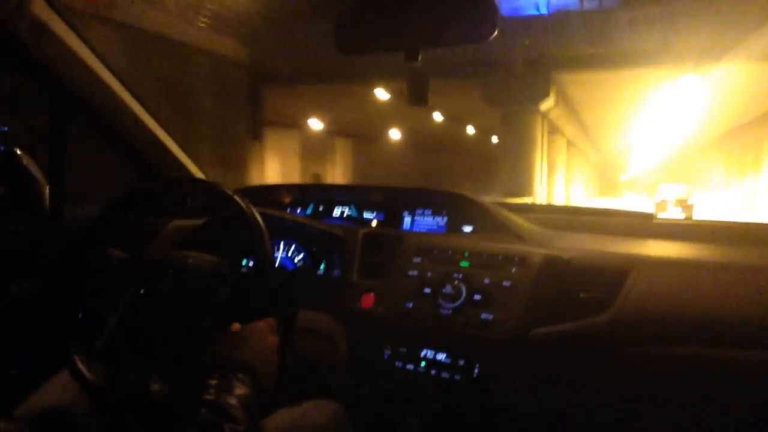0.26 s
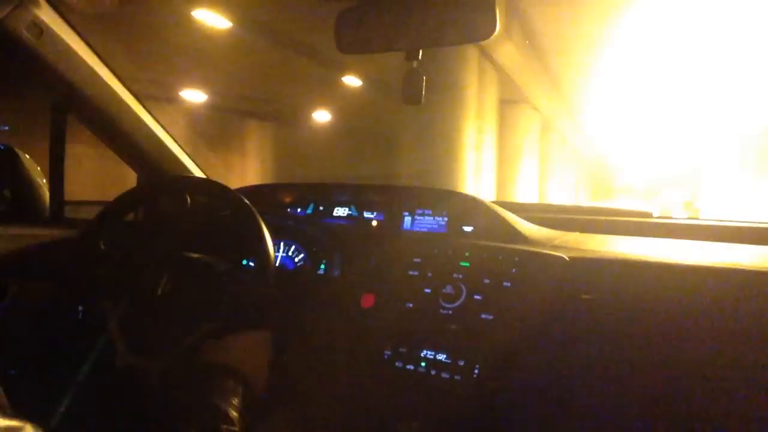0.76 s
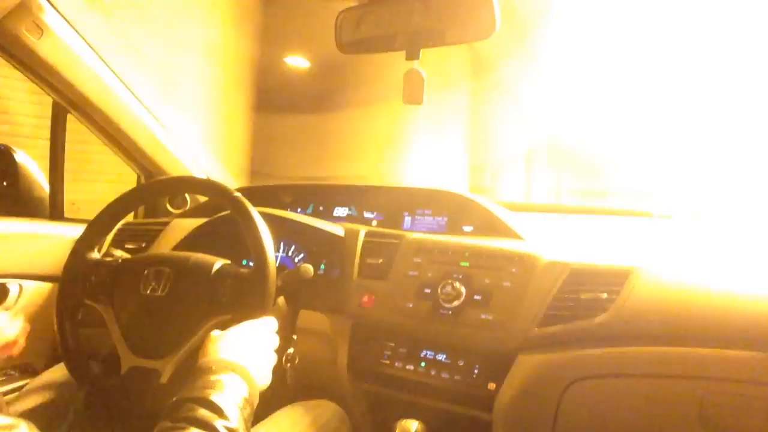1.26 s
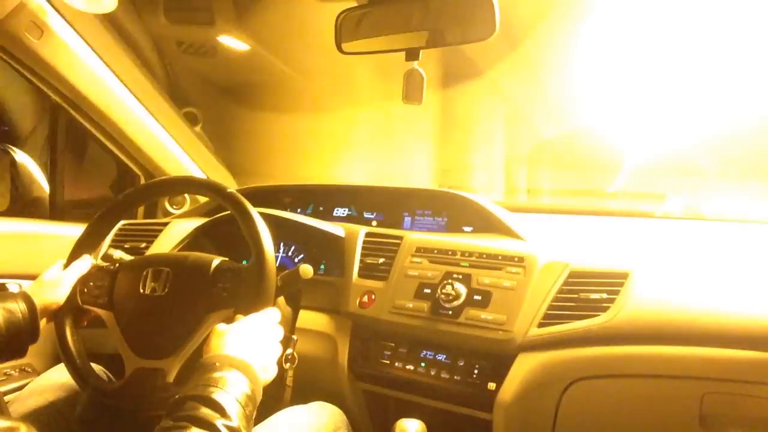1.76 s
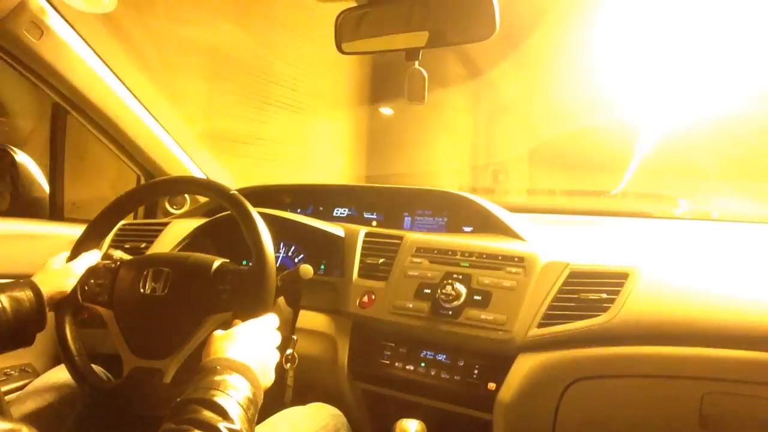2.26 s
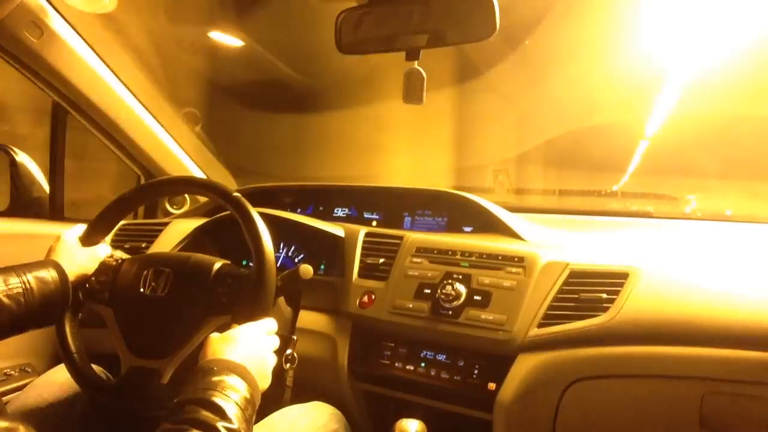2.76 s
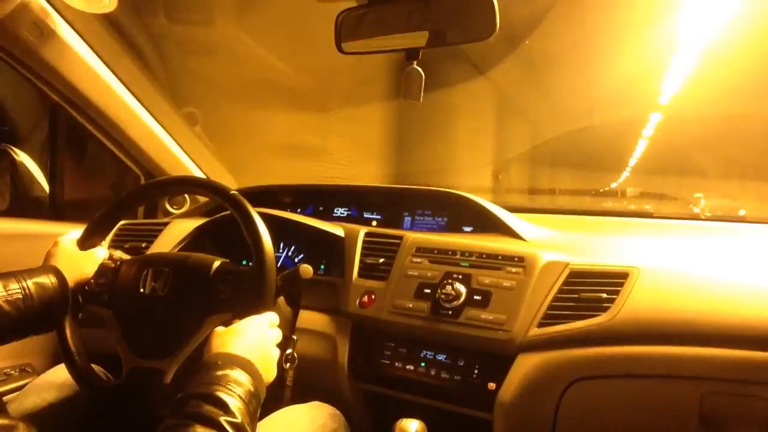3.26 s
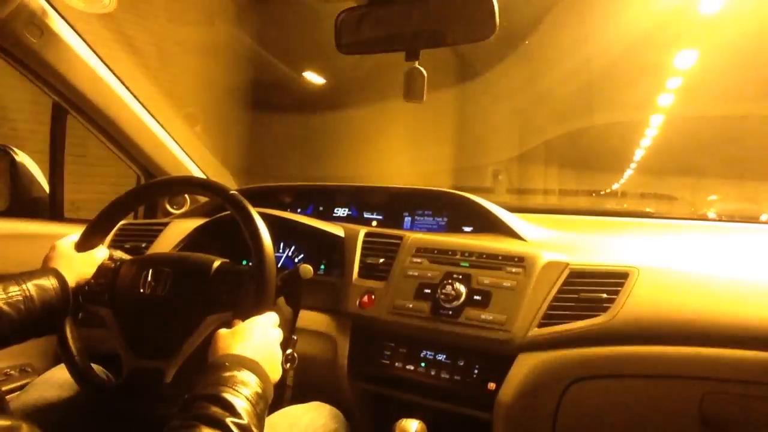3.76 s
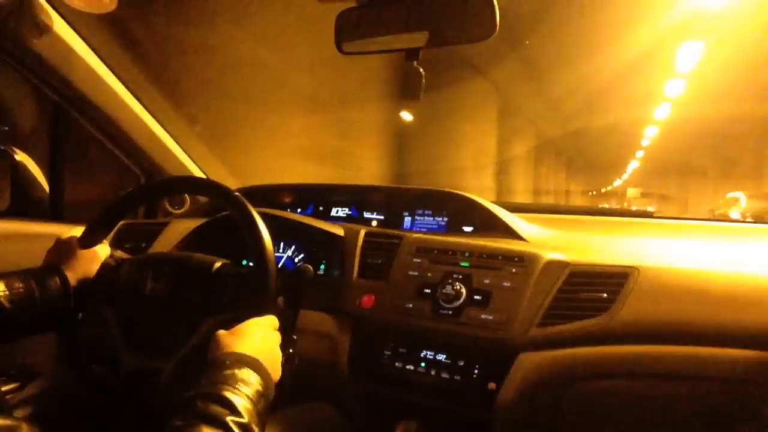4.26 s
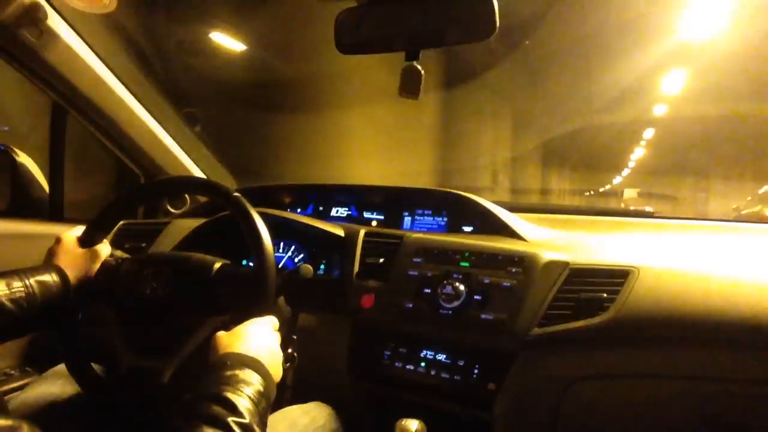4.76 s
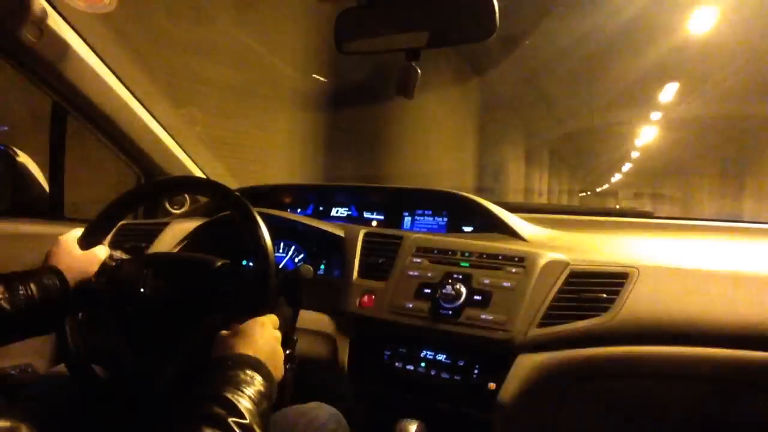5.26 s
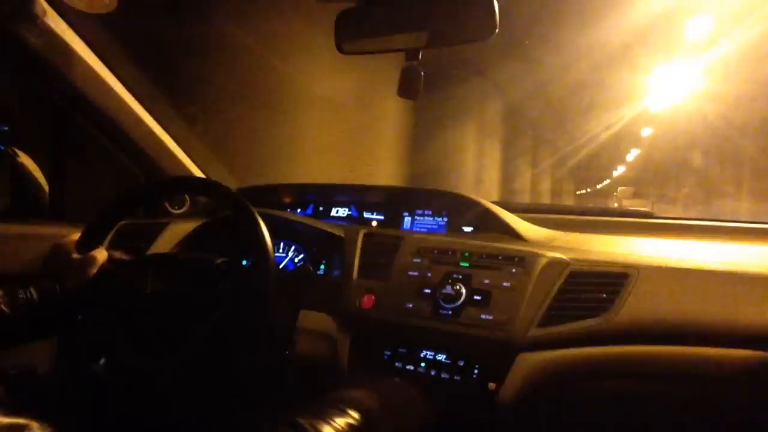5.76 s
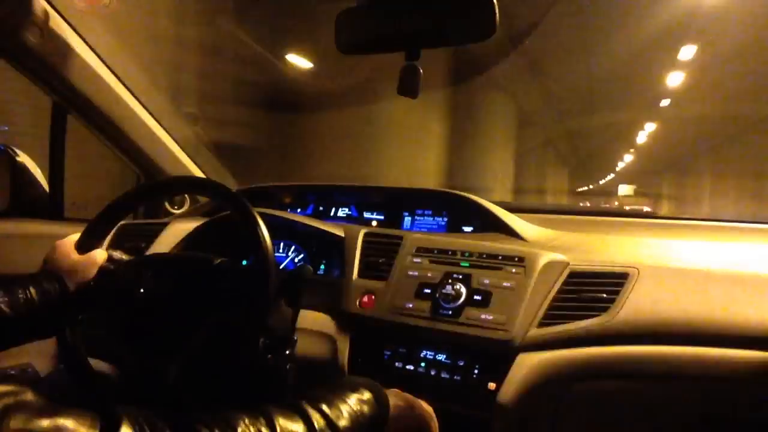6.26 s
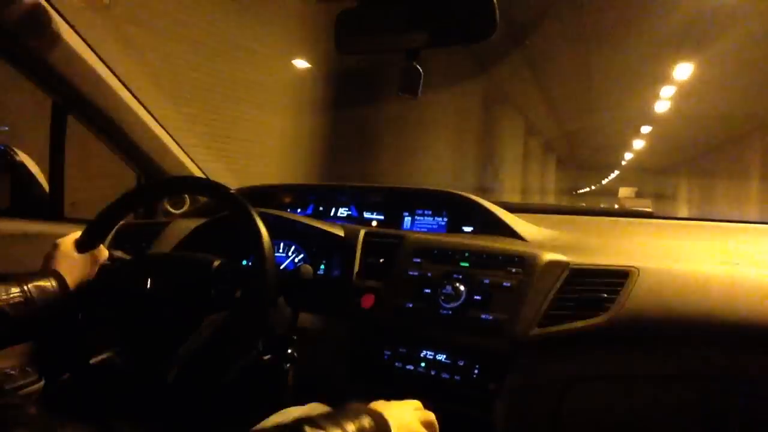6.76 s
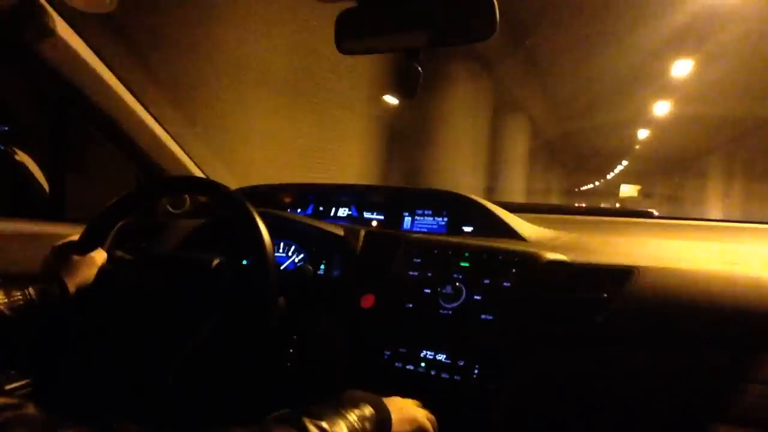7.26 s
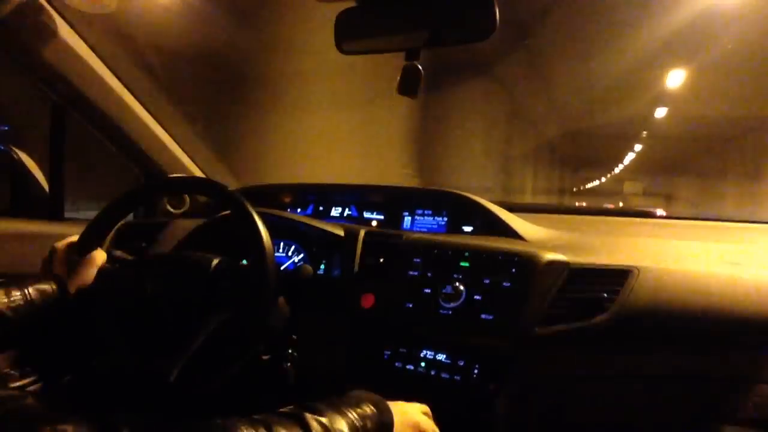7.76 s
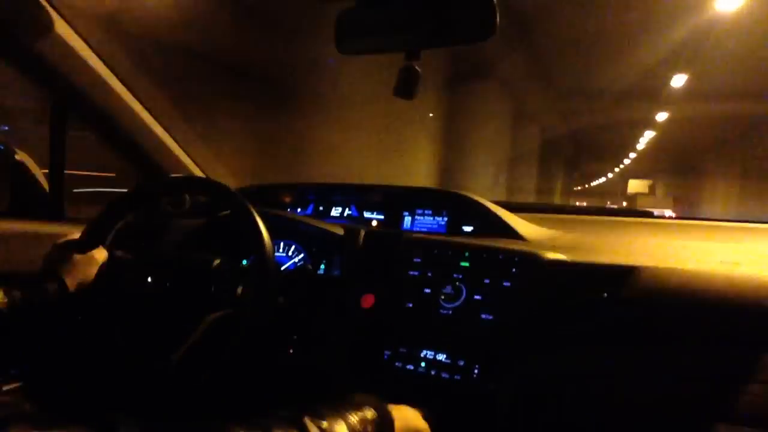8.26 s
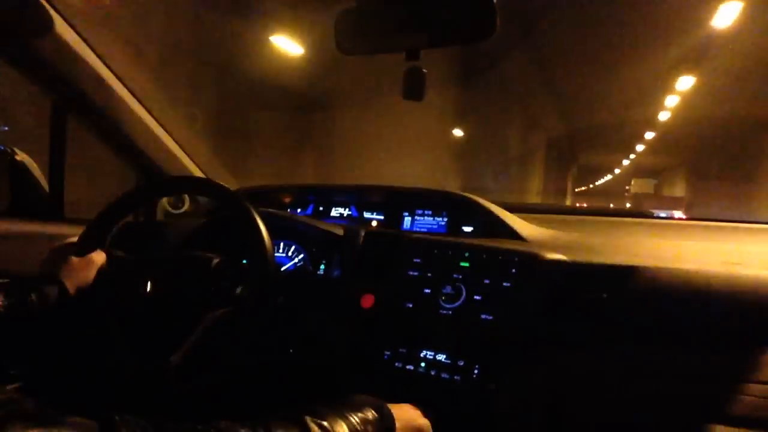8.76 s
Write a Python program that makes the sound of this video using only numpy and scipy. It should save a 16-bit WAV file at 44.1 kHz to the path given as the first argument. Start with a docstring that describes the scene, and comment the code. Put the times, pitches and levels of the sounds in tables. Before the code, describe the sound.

Inside a car accelerating through a tunnel, a booming four-cylinder exhaust climbs steadily in pitch over tyre roar and rushing air, after a rough, bumpy entrance.

```python
"""The exhaust of a four-cylinder car booms in the cabin as it accelerates into a road tunnel.
The boom is a sine at the firing rate, swelling at modes; a growl of engine orders and gas noise join it.
Tyres, rushing air and seals are coloured noise that eases into the tunnel; tread and air leak sing.
Bumps strike decaying body modes, loose trim ticks in bright bursts and wind tears past the mirrors."""
import sys
import numpy as np
from scipy import signal
from scipy.fft import rfft, irfft
from scipy.io import wavfile

SR = 44100
rng = np.random.default_rng(int(sys.argv[2]) if len(sys.argv) > 2 else 0)


def wav_out(sig):
    """Save sig, one row per channel (or a flat mono array), as 16-bit PCM at SR to the path in sys.argv[1]."""
    wavfile.write(sys.argv[1], SR, np.round(np.clip(np.atleast_2d(sig).T, -1, 1) * 32767).astype(np.int16))


N = 396900
TIME_S = np.arange(N) / SR


def from_db(db):
    """Decibels to amplitude gain."""
    return 10 ** (np.asarray(db) / 20)


def rms_one(x):
    """Scale to unit power."""
    return x / np.sqrt(np.mean(x ** 2) + 1e-20)


def lift(hz, resonances):
    """Gain in dB of a set of bell-shaped resonances at a frequency."""
    return sum(db / (1 + (2 * (hz - centre) / width) ** 2) for centre, width, db in resonances)


def dying(end_s, release_s):
    """Envelope: full until end_s, then an exponential release."""
    return np.exp(-np.maximum(TIME_S - end_s, 0) / release_s)


def held(start_s, end_s, attack_s, release_s):
    """Envelope: straight attack, hold, exponential release."""
    return np.clip((TIME_S - start_s) / attack_s, 0, 1) * dying(end_s, release_s)


def swell(centre_s, half_s):
    """Envelope: a smooth rise and fall around a moment."""
    return np.exp(-((TIME_S - centre_s) / half_s) ** 2)


def drift(corner_hz):
    """Slow random wander with spread 1: two-pole low-passed noise."""
    step = 40  # samples between drawn values
    pole = np.exp(-2 * np.pi * corner_hz * step / SR)
    settle = 2000  # filter start-up, dropped
    draws = rng.standard_normal(N // step + settle + 2)
    slow = signal.lfilter([1], [1, -2 * pole, pole ** 2], draws)[settle:]
    return np.interp(np.arange(N) / step, np.arange(len(slow)), rms_one(slow))


def resonant_noise(hz, width_hz):
    """Noise twice through one resonance, rms 1."""
    b, a = signal.iirpeak(hz, hz / width_hz, fs=SR)
    once = signal.lfilter(b, a, rng.standard_normal(N))
    return rms_one(signal.lfilter(b, a, once))


# Reflections between glass and dashboard. Each row: centre in Hz, lift in dB.
GLASS_RIPPLE = [(780, 8), (895, 6), (995, 4.5), (1210, 2.5), (1560, 3.5), (1710, 4.5), (1940, 6), (2110, 3),
                (2380, 1), (2790, 4), (3020, 4), (3320, 3.5), (3555, 2), (4120, 1)]


def cabin_noise(spectrum, ripple_width_hz=65):
    """Noise of a given colour, rippled by cabin reflections, rms 1."""
    hz, db = np.transpose(spectrum)
    bins_hz = np.maximum(np.arange(N // 2 + 1) * SR / N, 1)
    colour_db = np.interp(np.log(bins_hz), np.log(hz), db, left=-90, right=-90)
    ripples = [(centre, ripple_width_hz, lift_db) for centre, lift_db in GLASS_RIPPLE]
    gain = from_db(colour_db + lift(bins_hz, ripples))
    return rms_one(irfft(rfft(rng.standard_normal(N)) * gain, N))


CRUISE_HZ, PULL_AT_S, CLIMB_HZ_PER_S, DRAG_HZ_PER_S2 = 141.9, 1.5, 9.41, 0.1
THROTTLE_AT_S, THROTTLE_OPENS_S = 1.08, 0.71


def drive():
    """Throttle (0-1) and firing rate (Hz): cruise, then a pull in one gear, its climb eaten by drag."""
    throttle = np.clip((TIME_S - THROTTLE_AT_S) / THROTTLE_OPENS_S, 0, 1)
    pulling_s = np.maximum(TIME_S - PULL_AT_S, 0)
    return throttle, CRUISE_HZ + CLIMB_HZ_PER_S * pulling_s - DRAG_HZ_PER_S2 * pulling_s ** 2


def mirror_wind(firing_hz, top_db=-52, steepness=6.6):
    """Air tearing past the mirrors grows steeply with speed, which follows the revs in one gear."""
    speed = firing_hz / firing_hz.max()
    return from_db(top_db) * speed ** steepness * resonant_noise(hz=3260, width_hz=1000)


# Ticks of loose trim. Each row: start in seconds, level in dB, noise centre in Hz.
TRIM_TICKS = [(.035, -59, 6000), (.116, -46.5, 5700), (.2, -47, 5200), (.276, -49.5, 5100),
              (1.023, -66, 11800), (1.472, -64, 9400), (5.47, -64, 10500)]


def trim_ticks(rise_s=0.004, width_hz=2800):
    """Plastic parts chafe in short bright noise bursts."""
    out = np.zeros(N)
    for start_s, db, hz in TRIM_TICKS:
        age = np.maximum(TIME_S - start_s, 0) / rise_s
        envelope = age * np.exp(1 - age)  # peaks at 1 after rise_s
        out += from_db(db) * envelope * resonant_noise(hz, width_hz)
    return out


LEAK_DB, LEAK_ENDS_S, LEAK_RELEASE_S = -70, 0.3, 0.25


def air_leak():
    """Thin whistle of an air leak, a narrow noise band dying away at the tunnel mouth."""
    return from_db(LEAK_DB) * dying(LEAK_ENDS_S, LEAK_RELEASE_S) * resonant_noise(hz=12200, width_hz=900)


TREAD_OUTSIDE_DB, TREAD_INSIDE_DB, TREAD_ENDS_S, TREAD_RELEASE_S = -44.5, -61, 0.66, 0.024
TREAD_SURGE_S, TREAD_SURGE_HALF_S, TREAD_SURGE_DB = 0.648, 0.025, 9
TREAD_PATCHY_DB = 2.0


def singing_tread():
    """Tread sings as a noise band on the rough approach, surges once, then stays faint in the tunnel."""
    outside = from_db(TREAD_OUTSIDE_DB) * dying(TREAD_ENDS_S, TREAD_RELEASE_S)
    singing = from_db(TREAD_INSIDE_DB) + outside
    surge_db = TREAD_SURGE_DB * swell(TREAD_SURGE_S, TREAD_SURGE_HALF_S)
    flicker = from_db(TREAD_PATCHY_DB * drift(15) + surge_db)
    return singing * flicker * resonant_noise(hz=1000, width_hz=170)


def ring(force, hz, t60_s):
    """A unit click sets a mode of height 1 ringing; it passes no steady pressure."""
    pole, angle = from_db(-60 / (t60_s * SR)), 2 * np.pi * hz / SR
    # the tiny offset avoids denormals
    return signal.lfilter([0.5, 0, -0.5], [1, -2 * pole * np.cos(angle), pole ** 2], force + 1e-18)


# Body modes. Each row: frequency in Hz, level in dB, 60 dB decay time in seconds.
BODY_MODES = [(48, -8, .12), (77, -1, 0.092), (96, 0.5, 0.21), (128, -10, 0.13), (216, -14, 0.052)]


def body(force, soft_hz):
    """Road force reaches the body modes through the soft suspension, a low-pass."""
    suspension = signal.butter(2, soft_hz, fs=SR, output="sos")
    softened = signal.sosfilt(suspension, force + 1e-18)
    return sum(from_db(db) * ring(softened, hz, t60_s) for hz, db, t60_s in BODY_MODES)


# Bumps in the road. Each row: time in seconds, level of the click of force in dB.
ROAD_BUMPS = [(0.065, -24), (0.248, -21), (0.469, -19), (0.677, -25), (1.019, -28.5), (8.269, -17.5),
              (8.283, -18), (8.311, -21.5)]


def bumps():
    """Single blows to the floor, each a click of force."""
    blows = np.zeros(N)
    for time_s, db in ROAD_BUMPS:
        blows[round(time_s * SR)] = from_db(db)
    return body(blows, soft_hz=300)


SHAKE_DB, SHAKE_FROM_S, SHAKE_TO_S, SHAKE_ATTACK_S, SHAKE_RELEASE_S = -24.5, 0.31, 0.666, 0.041, 0.04


def broken_road(heave_db=-6, cavity_db=-7.5):
    """A broken stretch at the tunnel mouth shakes the body, the car heaves and the air in the tyres drones."""
    shake = rms_one(body(rng.standard_normal(N), soft_hz=428))
    heave = from_db(heave_db) * resonant_noise(hz=44.5, width_hz=13)
    cavity = from_db(cavity_db) * resonant_noise(hz=211, width_hz=61)
    envelope = held(SHAKE_FROM_S, SHAKE_TO_S, SHAKE_ATTACK_S, SHAKE_RELEASE_S)
    return from_db(SHAKE_DB) * envelope * (shake + heave + cavity)


COARSE_DB, COARSE_ENDS_S, COARSE_RELEASE_S = -36.5, 0.2, 0.22


def coarse_asphalt(patchy_db=3.0):
    """Coarse open road gives the tyres a brighter, lumpy roar that fades into the tunnel."""
    level = from_db(COARSE_DB + patchy_db * drift(41)) * dying(COARSE_ENDS_S, COARSE_RELEASE_S)
    return level * resonant_noise(hz=694, width_hz=790)


# Road layers. Each row: settled cruising level in dB, dB per doubling of speed, gain at full throttle in dB,
# early excess in dB, time it starts to settle in seconds, time it is gone in seconds.
# Where the start lies after the end, the excess drops out at once at the end.
FLOOR_LEVEL = (-33, 4, 1.5, 7.5, 1.5, 0.08)
TYRES_LEVEL = (-36.5, 4.5, 3.5, 27, -6, 0.5)
AIR_LEVEL = (-46.5, 7.5, 0.9, 3.5, -0.56, 1)
SEALS_LEVEL = (-66, 11.5, -.8, 13.5, -0.56, 1.3)
# Swells and lulls. Each row: centre in seconds, half length in seconds,
# then the change in rumble, roar, rush and hiss, each in dB.
ROAD_SWELLS = [(.47, 0.075, 3, 4.5, 2.5, -1), (1.552, 0.22, 1, 0.5, 0, 1), (3.22, 0.15, 1, -1, -.5, 1.5),
               (4.35, 0.54, 0, -1.5, 0.4, -1), (5.09, 0.32, -2, -1.3, 1, 0), (5.7, 0.23, 0.5, 0, 1.5, 0),
               (6.112, 0.069, 3, -.5, 2, 1), (6.38, 0.45, 1, 1.5, 2.2, 3), (7.202, 0.29, 1, -0.9, 0.4, -1),
               (8.2, 0.26, 3.5, -0.6, 0.3, 1), (8.8, 0.1, 4.5, -0.5, 1, 1)]


def road_levels(firing_hz, throttle):
    """Level in dB of each road layer, from speed, throttle, the way into the tunnel and the swells."""
    doublings = np.log2(firing_hz / CRUISE_HZ)
    levels_db = []
    for db, speed_db, throttle_db, excess_db, from_s, to_s in (FLOOR_LEVEL, TYRES_LEVEL, AIR_LEVEL, SEALS_LEVEL):
        settling_db = np.interp(TIME_S, [from_s, to_s], [excess_db, 0])
        levels_db.append(db + speed_db * doublings + throttle_db * throttle + settling_db)
    swells_db = sum(np.outer(dbs, swell(centre_s, half_s)) for centre_s, half_s, *dbs in ROAD_SWELLS)
    return np.array(levels_db) + swells_db


# Noise colours. Each row: frequency in Hz, relative density in dB per Hz.
RUMBLE_SPECTRUM = [(20, -33.5), (30, -23), (42, -8), (60, -6.5), (80, -3.5), (98, -2.5), (125, -2.5),
                   (170, -1), (220, -3.5), (270, -16.5), (400, -33.5)]
ROAR_SPECTRUM = [(170, -23), (240, -4), (295, 3.5), (350, 0), (400, -1.5), (520, -2), (630, -0.5),
                 (760, -10), (870, -11.5), (1020, -9), (1200, -13), (1500, -19.5), (2500, -50)]
RUSH_SPECTRUM = [(800, -22), (1200, -0.5), (1500, 0), (1900, -0.5), (2400, -1), (3000, -6), (3500, -9.5),
                 (4100, -15.5), (5000, -23.5), (7000, -35), (10000, -43)]
HISS_SPECTRUM = [(2500, -15), (4500, 3), (5800, 0.5), (7000, -1), (8000, -5), (10000, -6.5), (12300, -7.5),
                 (14000, -10), (15200, -14.5)]
RUMBLE_PATCHY_DB, ROAR_PATCHY_DB = 1.0, 1.0


def road_noise(phase, firing_hz, throttle, pulsing=0.091):
    """Tyres through the floor and the glass, a rush that pulses with the firings, air at the seals."""
    floor_db, tyres_db, air_db, seals_db = road_levels(firing_hz, throttle)
    rumble = from_db(floor_db + RUMBLE_PATCHY_DB * drift(17)) * cabin_noise(RUMBLE_SPECTRUM)
    # uneven asphalt makes the roar flicker
    roar = from_db(tyres_db + ROAR_PATCHY_DB * drift(29)) * cabin_noise(ROAR_SPECTRUM)
    rush = from_db(air_db) * cabin_noise(RUSH_SPECTRUM) * (1 + pulsing * np.cos(phase))
    hiss = from_db(seals_db) * cabin_noise(HISS_SPECTRUM)
    return rumble + roar + rush + hiss


SNARL_HZ, SNARL_WIDTH_HZ = 176, 11  # firing rates at which the engine snarls
RASP_DB = -39


def engine_rasp(phase, firing_hz):
    """In the snarl, gas noise puffs with every other firing."""
    snarl = np.exp(-(2 * (firing_hz - SNARL_HZ) / SNARL_WIDTH_HZ) ** 2)
    puffs = 1 + 0.5 * np.cos(phase / 2)
    return from_db(RASP_DB) * snarl * puffs * resonant_noise(hz=300, width_hz=260)


# Cabin resonances that the orders sweep through. Each row: centre in Hz, width in Hz, lift in dB.
CABIN_MODES = [(102, 9, 7), (292, 24, 3), (388, 30, 4), (455, 30, 4), (510, 36, 3), (600, 22, 6),
               (714, 26, 4.5), (772, 32, 5)]
# Engine orders; quarters come from unequal cylinders.
# Each row: multiple of the firing rate, cruising level in dB rms, lift in the snarl in dB.
ENGINE_ORDERS = [(.5, -50.5, 0), (1.5, -51, 7), (1.75, -57, 18), (2, -45, 5), (2.25, -53, 2), (2.5, -53, 4),
                 (2.75, -55, 5), (3, -53, -2), (3.5, -56, 3), (4, -54, 8.5), (4.25, -61, 10), (4.5, -60, 3),
                 (4.75, -60, 0), (5, -54, -4), (6, -63, 0), (7, -65, 0)]
GROWL_THROTTLE_DB, GROWL_DB_PER_DOUBLING = 1, 3.5
ORDER_WAVER_HZ, ORDER_WAVER_DEPTH = 7, 0.31


def engine_growl(phase, firing_hz, throttle):
    """Each order wavers on its own and swells in the snarl and as it passes a cabin resonance."""
    load_db = GROWL_THROTTLE_DB * throttle + GROWL_DB_PER_DOUBLING * np.log2(firing_hz / CRUISE_HZ)
    out = np.zeros(N)
    for multiple, db, snarl_db in ENGINE_ORDERS:
        cabin_lift_db = lift(multiple * firing_hz, CABIN_MODES)
        snarl_lift_db = lift(firing_hz, [(SNARL_HZ, SNARL_WIDTH_HZ, snarl_db)])
        angle = multiple * phase + 2 * np.pi * rng.random()
        in_phase = (1 + ORDER_WAVER_DEPTH * drift(ORDER_WAVER_HZ)) * np.sin(angle)
        quadrature = ORDER_WAVER_DEPTH * drift(ORDER_WAVER_HZ) * np.cos(angle)
        out += from_db(db + cabin_lift_db + snarl_lift_db) * (in_phase + quadrature)
    return np.sqrt(2) * from_db(load_db) * out  # sine peak from rms


# Exhaust and cabin modes the firing rate climbs through. Each row: centre in Hz, width in Hz, lift in dB.
EXHAUST_MODES = [(147.66, 19.9, 16), (160.8, 10.7, 10.5), (170.2, 3.1, 7), (190.6, 11.8, 9.5),
                 (200.16, 24.6, 20)]
BOOM_DB, BOOM_THROTTLE_DB, BOOM_WAVER_DB = -45, 4, -49  # rms: away from any mode; gain; slow waver


def exhaust_boom(phase, firing_hz, throttle):
    """The firing tone swells at each mode that it crosses; it flutters, and breaks up where it is weak."""
    boom_db = BOOM_DB + BOOM_THROTTLE_DB * throttle + lift(firing_hz, EXHAUST_MODES)
    flutter = 0.11 * drift(12)
    waver = from_db(BOOM_WAVER_DB) * drift(16)
    height = from_db(boom_db) * (1 + flutter) + waver
    return np.sqrt(2) * height * np.sin(phase)  # sine peak from rms


def scene():
    """Everything heard in the cabin, as one channel."""
    throttle, firing_hz = drive()
    phase = 2 * np.pi * np.cumsum(firing_hz) / SR
    wind = mirror_wind(firing_hz) + air_leak()
    tyres = road_noise(phase, firing_hz, throttle) + coarse_asphalt() + singing_tread()
    knocks = trim_ticks() + bumps() + broken_road()
    engine = engine_rasp(phase, firing_hz) + engine_growl(phase, firing_hz, throttle)
    return (wind + tyres + knocks + engine + exhaust_boom(phase, firing_hz, throttle))[None]


def record(dry, low_cut_hz=32, top_cut_hz=15250):
    """A small microphone loses the deepest bass; the top is cut steeply."""
    thin = signal.sosfilt(signal.butter(4, low_cut_hz, "high", fs=SR, output="sos"), dry)
    return signal.sosfilt(signal.ellip(12, 0.1, 90, top_cut_hz, fs=SR, output="sos"), thin)


dry = scene()
out = record(dry)
wav_out(out)
```